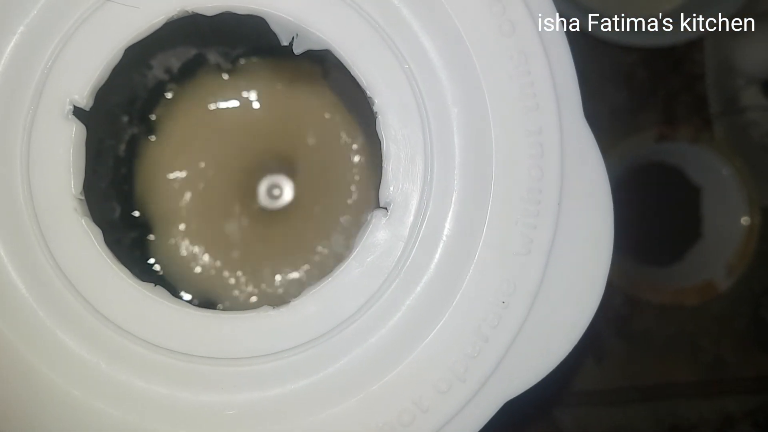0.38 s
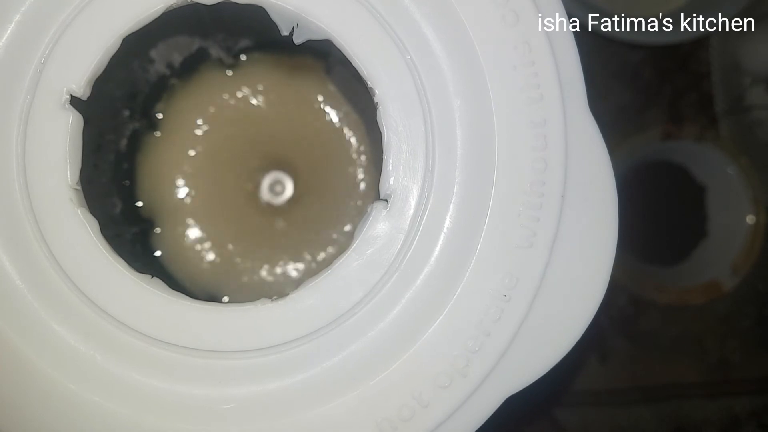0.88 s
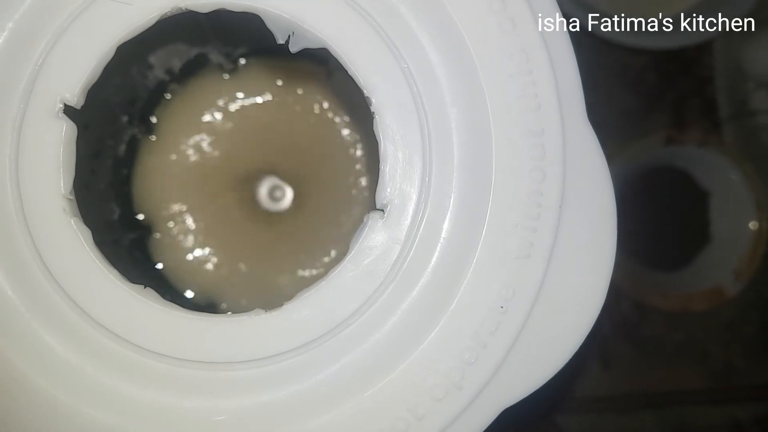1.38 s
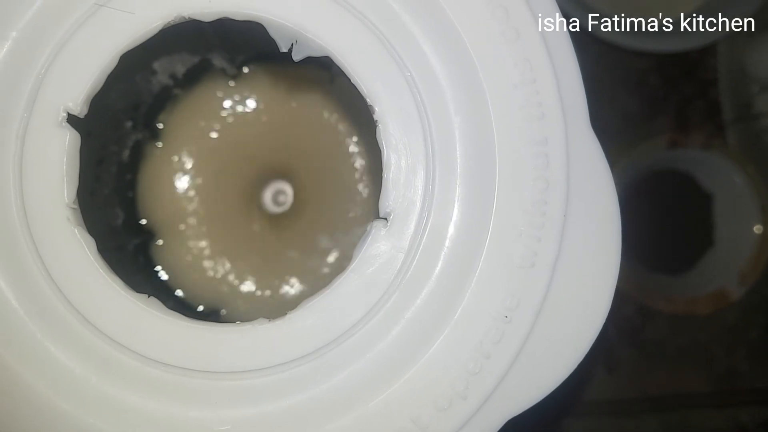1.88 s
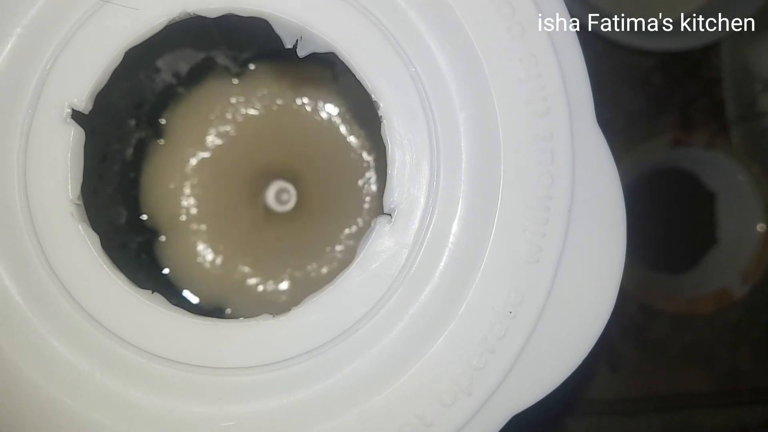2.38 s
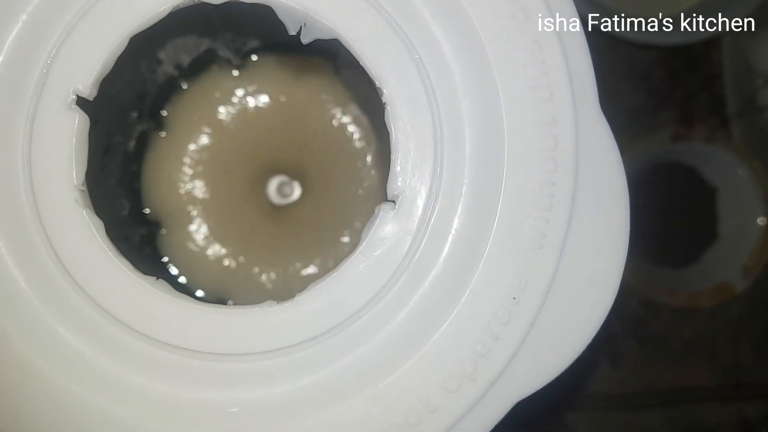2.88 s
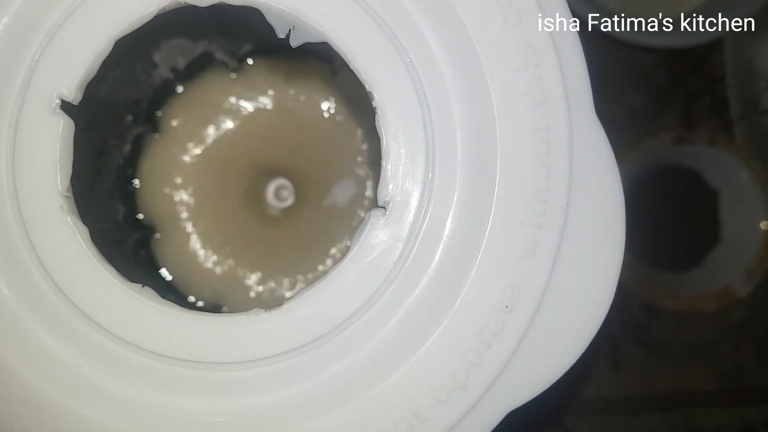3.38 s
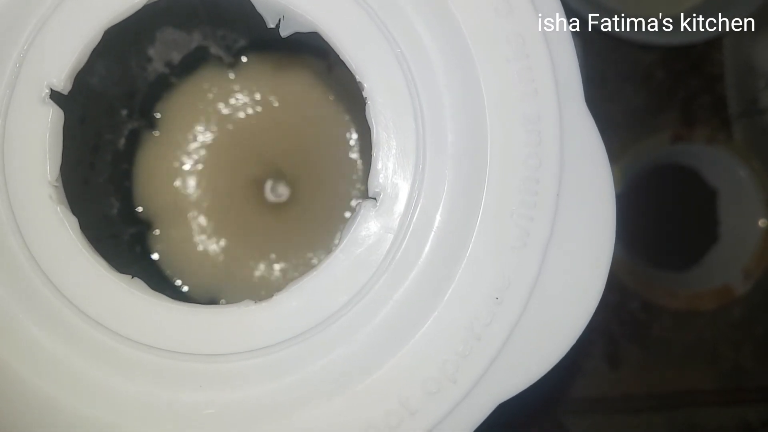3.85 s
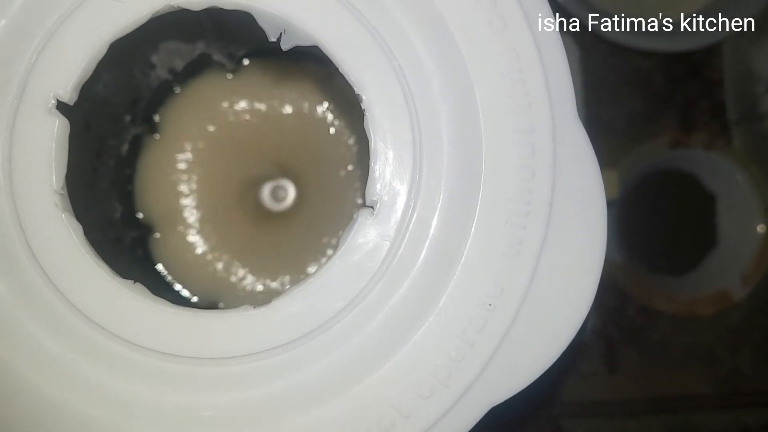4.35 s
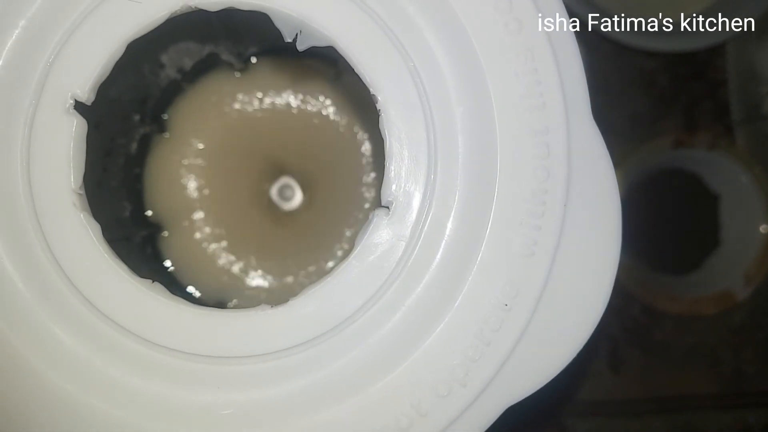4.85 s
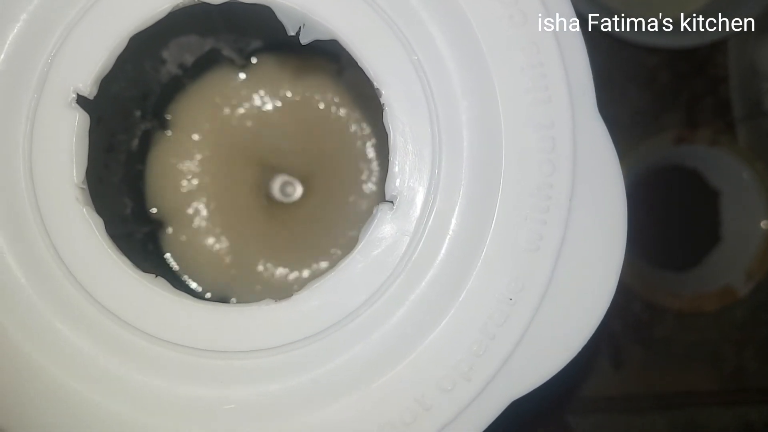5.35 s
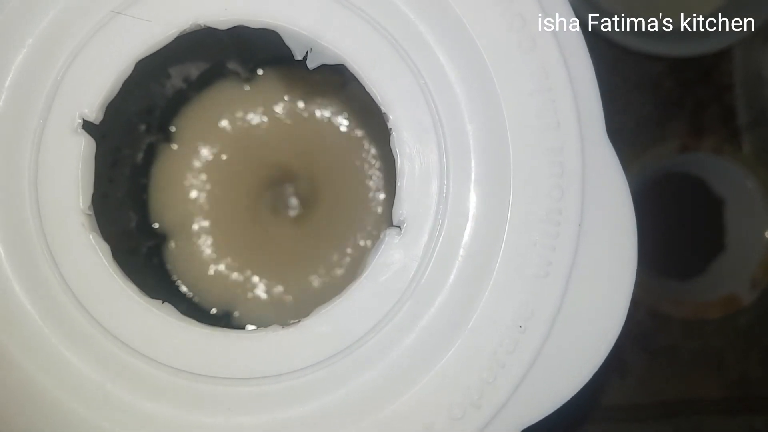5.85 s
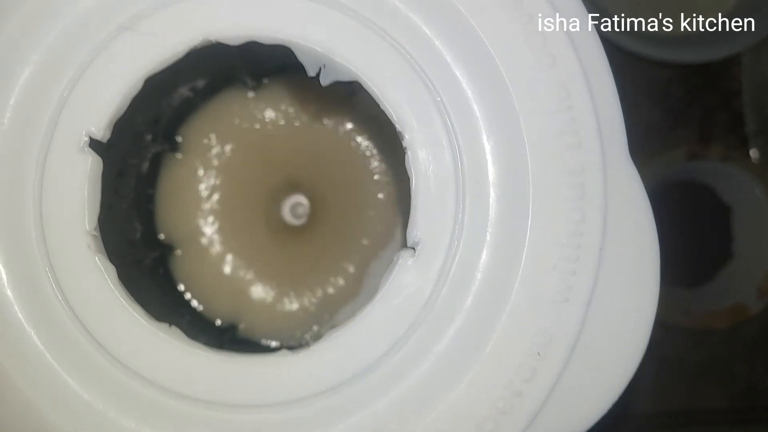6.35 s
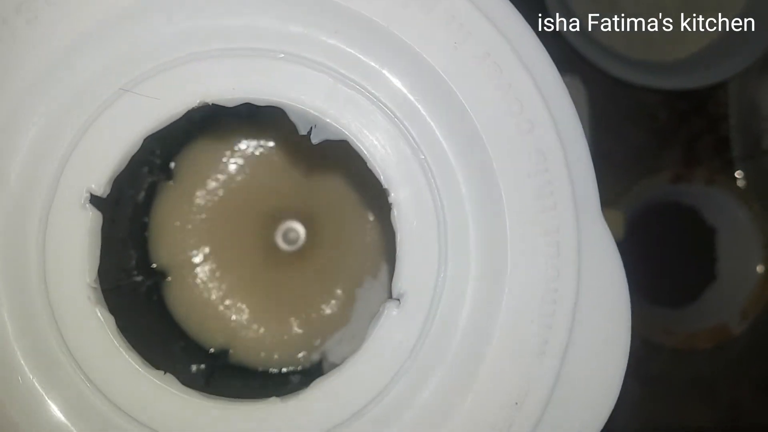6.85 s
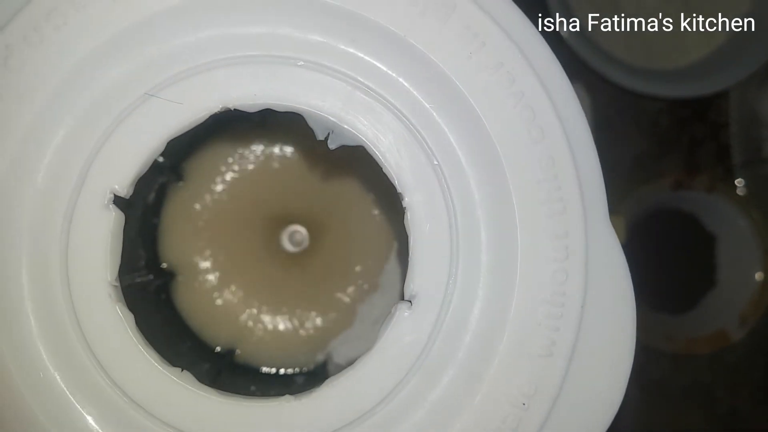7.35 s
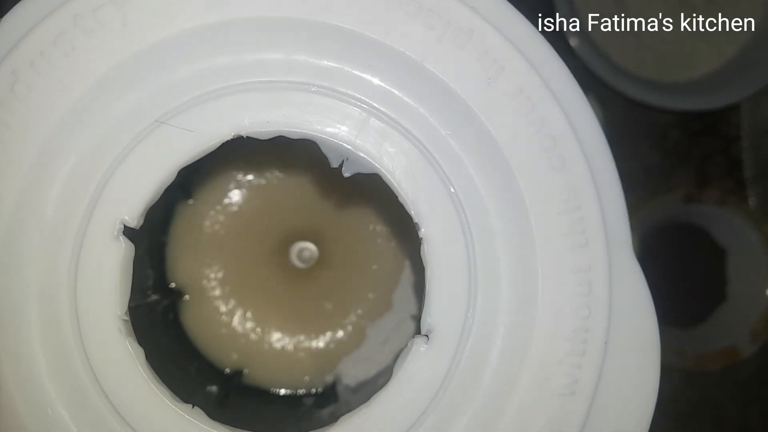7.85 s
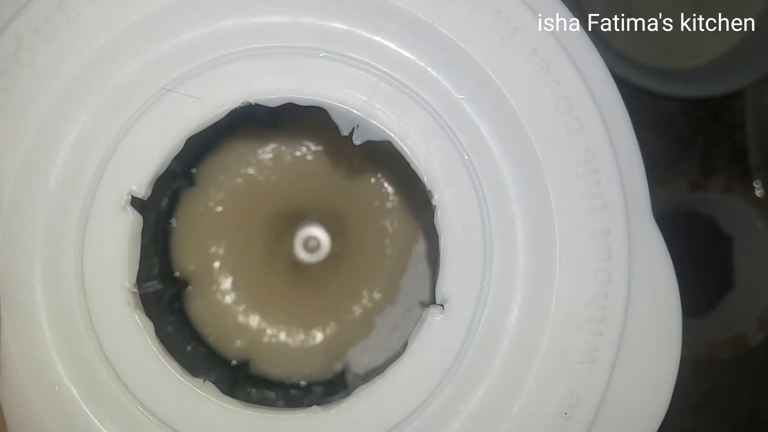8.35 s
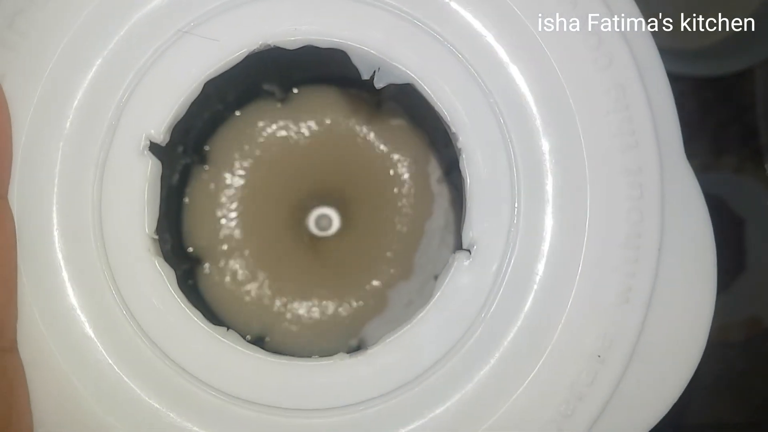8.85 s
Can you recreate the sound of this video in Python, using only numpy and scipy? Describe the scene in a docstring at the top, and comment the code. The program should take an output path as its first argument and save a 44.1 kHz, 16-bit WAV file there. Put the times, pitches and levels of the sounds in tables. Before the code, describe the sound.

Close above an open plastic blender jar, a low electric motor drones as thick liquid gurgles, slaps the walls and ticks in droplets.

```python
"""A blender runs at one setting with thick oil in its plastic jar, two microphones just above the open lid.
From the start the motor hums at mains and shaft rate, while oil sloshes, churns and spatters in jar and air column.
Surges are flung out, the air column booms, waves slap over and drops tick on the wall; the low oil noise is uneven.
The microphones begin half off the lid opening, are nearest it at 1.3 s, and slide away after 6 s as the shaft slows.
Noise and clicks ring the resonances; each microphone hears each resonance with its own level and lag."""
import sys
import numpy as np
from scipy import signal
from scipy.fft import rfft, irfft, next_fast_len
from scipy.io import wavfile

SR = 44100
rng = np.random.default_rng(int(sys.argv[2]) if len(sys.argv) > 2 else 0)


def ratio_of_db(decibels):
    """Turn decibels (scalar or array-like) into linear amplitude factors; 0 dB maps to 1."""
    return 10 ** (np.asarray(decibels, float) / 20)


def waveform_to_disk(signal):
    """Save audio, clipped to [-1, 1], as 16-bit WAV at the path in sys.argv[1]."""
    frames = np.transpose(np.atleast_2d(signal))
    scaled = np.clip(frames, -1, 1) * 32767
    samples = np.round(scaled).astype(np.int16)
    wavfile.write(sys.argv[1], SR, samples)


N = 396018
MAINS_HZ = 50


def rms_one(x):
    """Scales a signal to rms 1."""
    return x / np.sqrt(np.mean(x ** 2) + 1e-20)


def in_time(rows):
    """Draws straight lines through (s, value, ..) rows, one curve per column."""
    s, *columns = np.transpose(rows)
    return [np.interp(np.arange(N) / SR, s, c) for c in columns]


def drift(rate_hz):
    """Slow chance of spread 1: noise at every 40th sample through a double one-pole low-pass."""
    r = np.exp(-80 * np.pi * rate_hz / SR)
    noise = rng.standard_normal(N // 40 + 2002)
    slow = signal.lfilter([1], [1, -2 * r, r * r], noise)[2000:]
    return np.interp(np.arange(N) / 40, np.arange(len(slow)), rms_one(slow - slow.mean()))


def bumps(s, rise_db, length_s):
    """Bell-shaped swells in dB around the times s, down to 1/e at length_s to either side."""
    coarse = np.arange(0, N + 100, 100) / SR
    bells = np.exp(-((coarse - np.c_[s]) / np.c_[length_s]) ** 2)
    swell_db = np.sum(np.c_[rise_db] * bells, axis=0)
    return np.interp(np.arange(N) / SR, coarse, swell_db)


def resonate(x, hz, width_hz):
    """A resonance passed twice, for steep flanks; gain 1 on top."""
    r = np.exp(-np.pi * 1.55 * width_hz / SR)   # each pass is wider, as two passes narrow the peak
    stage = [(1 - r * r) / 2, 0, (r * r - 1) / 2, 1, -2 * r * np.cos(2 * np.pi * hz / SR), r * r]
    return signal.sosfilt([stage, stage], x)


def ring(x, hz, width_hz):
    """A resonance passed once: it speaks at once and dies away."""
    r = np.exp(-np.pi * width_hz / SR)
    return signal.lfilter([(1 - r * r) / 2, 0, (r * r - 1) / 2],
                          [1, -2 * r * np.cos(2 * np.pi * hz / SR), r * r], x)


def place(pair, hz, left_db, right_db, lag):
    """Level at each microphone; the right one hears it a part of a cycle later."""
    late = np.roll(pair[1], round(lag * SR / (2 * np.pi * hz)))
    return np.array([ratio_of_db(left_db) * pair[0], ratio_of_db(right_db) * late])


# Magnetic hum. Each row: multiple of mains, level in dB.
HUM = [(1, -54), (2, -45.5), (3, -66), (4, -36.5), (6, -32)]
# The shaft sags as the load grows. Each row: time in seconds, turns in Hz.
SHAFT = [(0, 124.7), (.4, 124.5), (1.5, 122.4), (1.9, 124), (2.4, 127.4), (3.7, 126.1), (4.1, 125.8),
         (4.8, 123.9), (5.6, 124), (6, 122.6), (6.5, 119), (6.75, 120.7), (7.1, 118.3), (7.3, 119.8),
         (7.55, 117.5), (8.2, 120), (8.45, 115.8), (8.75, 118.9), (8.98, 116)]
# Tones of the rotor. Each row: multiple of shaft rate, added multiple of mains, level in dB, waver in dB.
ROTOR = [(1, 0, -35.5, 0.5), (1, 2, -32, 2), (2, 0, -38, 4)]


def motor():
    """Magnetic hum at mains multiples, unbalance at shaft rate and its beat with the pulsing torque."""
    mains = 2 * np.pi * MAINS_HZ * np.arange(N) / SR
    shaft = 2 * np.pi * np.cumsum(in_time(SHAFT)[0]) / SR
    hum = sum(ratio_of_db(db + 0.5 * k * drift(4.6)) * np.sin(round(k) * mains) for k, db in HUM)
    rotor = 0
    for k, m, db, waver_db in ROTOR:
        level = ratio_of_db(db + waver_db * drift(7.9))
        rotor = rotor + level * np.sin(round(k) * shaft + round(m) * mains + 0.25 * drift(4.3))
    return np.sqrt(2) * (hum + rotor) * ratio_of_db([[-.6], [.6]])   # a little stronger on the right


# Broad roar between the resonances. Each row: frequency in Hz, left and right density in dB per Hz,
# relative to the resonances.
WASH = [(35, -76, -80), (75, -70, -78), (110, -68, -67), (143, -68, -65), (164, -56, -53), (240, -55, -51),
        (405, -54.5, -55), (672, -63.5, -60), (1214, -54.5, -52.5), (1360, -64, -56.5), (1770, -68, -59),
        (2950, -77, -61.5), (3630, -68.5, -60), (5230, -95, -76.5), (6010, -77, -66.5), (7370, -89, -78.5),
        (11700, -95.5, -100), (15500, -85, -82)]
# How far both microphones hear the same roar. Each row: frequency in Hz, likeness from 0 to 1.
WASH_ALIKE = [(100, 1), (500, 0.51), (900, 0.78), (1500, 0.2), (15000, 0)]


def roar(low_hz, high_hz):
    """Smooth turbulent noise of one band, most alike on both sides in the bass."""
    size = next_fast_len(N)
    hz = np.fft.rfftfreq(size, 1 / SR) + 1e-3
    at, left_db, right_db = np.transpose(WASH)
    density_db = [np.interp(np.log(hz), np.log(at), db) for db in (left_db, right_db)]
    colour = ratio_of_db(density_db) * np.sqrt(SR / 2)
    at, likeness = np.transpose(WASH_ALIKE)
    alike = np.clip(np.interp(np.log(hz), np.log(at), likeness), 0, 1)
    shared, *own = rfft(rng.standard_normal((3, size)))
    inside = ((1 + (low_hz / hz) ** 24) * (1 + (hz / high_hz) ** 24)) ** -.5
    both = np.sqrt(alike) * shared + np.sqrt(1 - alike) * np.array(own)
    return irfft(colour * inside * both, size)[:, :N]


# Resonances of jar and air column. Each row: frequency in Hz, width in Hz, relative left and right level in dB.
JAR = [(175.4, 25, -31, -30), (302.4, 30.7, -25.5, -22.5), (365.3, 38, -31, -29), (491, 110, -34.5, -33.5),
       (1009.5, 83, -31.5, -32.5), (1280, 66, -30, -26.5), (1583, 116, -34.5, -28),
       (2163, 85, -39.5, -43.5), (2380, 70, -38, -32.5), (2535, 100, -42.5, -35.5), (3118, 150, -39.5, -36),
       (3614, 94, -53, -34), (4110, 520, -34, -26.5), (4830, 110, -41.5, -34), (4990, 360, -41, -76),
       (5770, 850, -75, -51), (6520, 640, -46, -45), (7536, 170, -74, -42.5), (8280, 250, -43, -48.5),
       (8620, 440, -45, -43.5), (9250, 390, -37, -59), (10260, 200, -36.5, -49), (11470, 430, -40, -45.5),
       (12350, 460, -35, -44), (13360, 910, -31.5, -33.5), (14160, 800, -33, -32), (14800, 400, -43, -38),
       (15100, 500, -40, -38)]
# How the two microphones share them, in the same order. Each row: approximate frequency in Hz (a label),
# lag of the right one in radians, left-right likeness of smooth noise from 0 to 1.
PAIR = [(178, -0.1, 0.99), (301, 0.2, 0.99), (380, 0.4, 0.97), (490, 0.3, 0.95), (1010, 0.1, 0.87),
        (1280, 1.1, 0.87), (1600, 2.8, 0.63), (2165, -1.1, 0.48), (2385, -0.1, 0.72), (2520, 2.5, 0.4),
        (3250, -2.8, 0.15), (3610, 1.3, 0.67), (4150, 1.9, 0.85), (4850, 2.9, 0.28), (5250, -3.1, 0.83),
        (5550, 3.1, 0.8), (6600, -2.9, 0.71), (7480, -1.8, 0.4), (8150, -1.3, 0.44), (8600, 0.1, 0.61),
        (9250, 0.6, 0.38), (10250, 3.1, 0.53), (11400, -1.5, 0.25), (12250, -1.8, 0.27),
        (13300, -0.2, 0.38), (14100, -2.2, 0.25), (14600, -2.4, 0.3), (15050, -0.6, 0.27)]


def resonances():
    """Each resonance of the jar with its width, levels, lag and likeness."""
    return [(*body, lag, alike) for body, (_, lag, alike) in zip(JAR, PAIR)]


def strike(s, peak_db, reach_db, body=resonate):
    """Blows at times s ring every resonance, each as strongly as reach_db(hz) says."""
    out = np.zeros((2, N))
    for hz, width_hz, left_db, right_db, lag, _ in resonances():
        clicks = np.full(N, 1e-18)
        blow_db = peak_db + reach_db(hz) + rng.normal(0, 1.8, len(s))
        clicks[(s * SR).astype(int)] = ratio_of_db(blow_db) * SR / np.sqrt(width_hz)
        out += place([body(clicks, hz, width_hz)] * 2, hz, left_db, right_db, lag)
    return out


# The loudest drops hitting the wall. Each row: time in seconds, relative level in dB, brightness in dB.
DROPS = [(0.4266, -10, -4), (0.4743, -11, -4), (0.7325, -11, -4), (1.3326, -5, -9), (1.37, -8, -12),
         (1.392, -9, -6), (1.444, -8, -6), (1.5758, -8, -15), (1.6162, -2.5, -21), (1.6705, -11.5, -7),
         (1.7539, -9, -21), (1.7777, -3, -15), (1.856, -12, -5), (1.8765, -7, -9), (1.927, -9.5, -1),
         (1.9659, -7, -15), (2.151, -8, -20), (2.38, -10, -8), (2.4758, -6, -12), (2.8355, -9, -17),
         (2.8898, -12, 1), (3.0121, -10, -22), (3.1767, -17, 3), (3.6096, -8, -18), (3.9916, -8, -11),
         (4.349, -7, -18), (4.4223, -7, -15), (4.6887, -1, -23), (4.862, -13, -18), (4.882, -16, -15),
         (5.052, -10, -10), (5.224, -7, -18), (5.2844, -10, -13), (5.332, -11, -15), (5.367, -9, -17),
         (5.437, -10, -18), (5.482, -12, -15), (5.5298, -3.5, -19), (5.6955, -10, -21), (6.0564, -8.5, -6),
         (7.1147, -4, -12), (7.1417, -26, 12), (7.223, -8, -8), (7.412, -15, -17), (7.5323, -6, -13),
         (7.581, -13, -18), (7.605, -13, -18), (7.6505, -24, -15), (7.66, -2, -20), (7.666, -9, -1),
         (7.717, -12, -7), (7.775, -12, -12), (8.487, -11, 7), (8.5894, -2, -9), (8.6393, -10, -4),
         (8.801, -22, 8)]
# Smaller drops fall at random moments.
STRAY_DROPS, STRAY_DB, STRAY_SPREAD_DB, STRAY_BRIGHT_DB = 140, -24.5, 4.5, -24
STRAY_SLID_DB = 1   # rise of the small drops at full slide
STRAY_FOLLOWS = 1   # share of the splash swing in their size
DROP_SMEAR_S = .006   # a drop bursts in three touches within this time


def drops():
    """A drop rings mostly near 4 kHz; a bright one reaches the highest resonances."""
    when, size = rng.random((STRAY_DROPS, 2)).T
    when_s = when * (N / SR - .1)
    splash_db = np.interp(when_s, *np.transpose(SPLASH)) - USUAL_SPLASH_DB
    slid_db = STRAY_SLID_DB * np.interp(when_s, *np.transpose(SLIDE))
    stray_db = STRAY_DB + STRAY_SPREAD_DB * (2 * size - 1) + STRAY_FOLLOWS * splash_db + slid_db
    stray = np.c_[when_s, stray_db, STRAY_BRIGHT_DB + 0 * when]
    s, peak_db, bright_db = np.repeat(np.vstack([DROPS, stray]), 3, axis=0).T
    touch_s = s + DROP_SMEAR_S * (rng.random(len(s)) - .3)

    def reach_db(hz):
        treble_db = bright_db * np.clip(np.log(hz / 4300) / .5, 0, 1)
        return treble_db - 17 * max(np.log(4000 / hz), 0)

    return strike(touch_s.clip(0), peak_db - 15, reach_db)


# Waves of oil folding over against the wall, ringing the resonances near their pitch.
# Each row: time in seconds, relative level in dB, pitch in Hz.
SLAPS = [(0.025, -5, 1020), (0.196, -12, 1250), (0.412, -12, 1050), (0.556, -9, 982), (0.734, -2, 1150),
         (0.79, -19, 991), (0.872, -2, 1040), (1.147, -20, 1160), (1.25, -7, 1270), (1.557, -12, 1260),
         (2.159, -8, 1250), (2.449, -7, 1276), (2.593, -3, 1260), (2.869, -11, 1280), (2.894, -5, 1250),
         (3.001, 1, 1250), (3.055, -22, 1284), (3.105, -12, 1300), (3.181, -6, 1283), (3.252, -8, 1260),
         (3.303, -8, 1330), (3.595, -3, 1060), (3.701, -1, 990), (3.974, -4, 1010), (4.047, -1.5, 1240),
         (4.135, -3.5, 1270), (4.219, -8, 1010), (4.259, -11, 1030), (4.401, -10, 1240), (4.469, -4, 1290),
         (4.572, -20, 1270), (4.819, -10, 1270), (4.866, -18, 1252), (5.818, -13, 1134), (5.868, -4, 1280),
         (5.911, -3, 1310), (6.056, -7, 1070), (6.407, -4, 1050), (6.56, -17, 1270), (7.085, -14, 1040),
         (7.3, 0, 1040), (7.465, -2, 996), (7.515, -5, 1270), (7.553, -15, 700), (7.577, 1.5, 970),
         (7.667, -5, 1270), (8.266, -2, 980), (8.479, -8, 1280), (8.902, -8, 1307), (0.7088, -19, 2380),
         (0.7916, -26, 2360), (0.926, -30, 2320), (0.991, -12.5, 2410), (1.068, -11.5, 2370),
         (1.273, -15, 2340), (1.833, -11, 2390), (2.5318, -13, 2390), (2.6944, -17, 2400),
         (3.0485, -23, 2400), (3.6665, -13, 2395), (3.8631, -28, 2400), (4.3236, -14, 2360),
         (4.4084, -14, 2380), (4.573, -12, 2340), (5.2328, -8, 2400), (5.3592, -13, 2355),
         (5.42, -19, 2380), (7.5877, -10, 2410), (7.666, -10, 2390), (8.063, -13, 2430),
         (8.7022, -11, 2380)]
SLAP_RING_DB, SLAP_THUD_DB = -11.5, 18.5
SLAP_REACH_DB = 19.5   # loss per e-fold of pitch away
SLAP_HIGH_DB = 8   # a small high slap strikes harder for its level, per octave
SLAP_SOFT_HZ = 4000   # the ringing of the slaps is dull above this


def slaps():
    """A slap is a blunt thud of about one cycle that rings the resonances near its pitch."""
    s, peak_db, pitch_hz = np.transpose(SLAPS)
    clicks = np.full(N, 1e-18)
    clicks[(s * SR).astype(int)] = -ratio_of_db(peak_db + SLAP_THUD_DB) * (1000 / pitch_hz) ** 2
    thud = resonate(clicks, 710, 510)

    def reach_db(hz):
        return -SLAP_REACH_DB * abs(np.log(hz / pitch_hz))

    ring_db = peak_db + SLAP_RING_DB + SLAP_HIGH_DB * np.log2(pitch_hz / 1250)
    ringing = strike(s, ring_db, reach_db, body=ring)
    soft = signal.butter(2, SLAP_SOFT_HZ, fs=SR, output="sos")
    return thud + signal.sosfilt(soft, ringing)


# The air column in the vortex is knocked and rings out.
# Each row: time in seconds, relative peak in dB, pitch in Hz.
BOOMS = [(0.162, -5, 328), (0.35, -7, 307), (0.593, -3.5, 303), (1.038, -6, 308), (1.106, -6, 332),
         (1.586, -9, 300), (1.671, -9, 310), (2.167, -10, 313), (2.676, -15, 303), (2.739, -3.5, 296),
         (2.848, -3, 287), (2.982, -7, 316), (3.121, -7, 313), (3.347, -6, 282), (3.512, -3.5, 310),
         (3.591, -4, 310), (4.11, -7, 296), (4.443, -9, 304), (4.548, -3.5, 304), (4.698, -6, 304),
         (5.153, -4.5, 299), (5.949, -3, 306), (6.424, -15, 335), (6.685, -23, 295), (6.95, -2.5, 324),
         (7.096, -2, 300), (7.307, -2, 285), (7.602, -3.5, 302), (7.855, -1.5, 310), (8.04, -29, 305),
         (8.208, -8, 304), (8.31, -5, 313), (8.377, 0.5, 314), (8.638, -5, 293), (8.806, -5, 334),
         (8.926, -6, 344)]
BOOM_RISE_S, BOOM_DECAY_S, BOOM_DB = 0.0039, 0.013, -8.5


def booms():
    """Each knock on the air column swells within a cycle or two and dies away."""
    out, t = np.zeros(N + SR), np.arange(SR // 8) / SR
    shape = (1 - np.exp(-t / BOOM_RISE_S)) * np.exp(-t / BOOM_DECAY_S)
    for (s, peak_db, hz), turn in zip(BOOMS, rng.random(len(BOOMS))):
        tone = np.sin(2 * np.pi * (hz * t + turn))
        out[int(s * SR):][:len(t)] += ratio_of_db(peak_db + BOOM_DB) * shape / shape.max() * tone
    return out[:N] * ratio_of_db([[-1.2], [1.2]])


def motion(low_hz, high_hz, per_s, spread_db, share, flicker_db, throb):
    """Turbulence and clumped grains of oil drive every resonance in the band, throbbing with the torque."""
    share, swell_db = np.clip(share, 0, 1), 0.43 * flicker_db * drift(34.0)
    born = rng.random(N) < per_s * ratio_of_db(5 * drift(25)) / SR   # grains come in clumps
    grain_size = ratio_of_db(spread_db * np.minimum(rng.exponential(1, N), 4))
    grains = born * grain_size * rng.choice([-1, 1], N)
    out = roar(low_hz, high_hz)
    for hz, width_hz, left_db, right_db, lag, alike in resonances():
        if low_hz < hz <= high_hz:
            shared, *own = rng.standard_normal((3, N))
            smooth = np.sqrt(alike) * shared + np.sqrt(1 - alike) * np.array(own)
            grit = rms_one(grains * ratio_of_db(2.9 * own[0]))   # a grain strikes each resonance unevenly
            force = np.sqrt(1 - share) * smooth + np.sqrt(share) * grit
            force = force * ratio_of_db(flicker_db * drift(11.7))
            out += place(rms_one(resonate(force, hz, width_hz)), hz, left_db, right_db, lag)
    torque = 1 + throb * np.sin(2 * np.pi * MAINS_HZ * np.arange(N) / SR)
    level = np.sqrt(np.mean(out.mean(axis=0) ** 2))   # rms of both microphones averaged
    return ratio_of_db(swell_db) * torque * out / level


# Rumble, heave, slosh, swirl, churn, spatter and spray. Each row: low and high edge in Hz,
# typical grains per second, grain spread in dB, grain share from 0 to 1, flicker in dB, mains throb from 0 to 1.
MOTIONS = [(30, 150, 97, 4.5, 0.01, 0, 0), (164, 222, 82, 4.5, 0.04, 0.5, 0),
           (218, 375, 150, 3.5, 0.24, 1.0, 0.06), (457, 803, 250, 7, 0.32, 3.5, 0.02),
           (873, 2960, 440, 4, 0.33, 2, 0.14), (3040, 7600, 900, 6.5, 0.53, 2, 0.07),
           (6500, 14000, 4500, 6, 0.63, 1.5, 0.08)]
# How those motions follow the splashing. Each row: level at rest in dB, share of the splash swing,
# share of a surge, shared flutter in dB.
FOLLOWING = [(-43.5, -0.13, 0.01, 0), (-31, -0.17, 0.087, 1), (-24.5, 0.49, 0.065, 0.5),
             (-34, 0.23, 1, 1.17), (-23.5, -0.002, 0.25, 0.65), (-33, 0.21, 0.4, 0.9), (-39, 0.9, 0.51, 1)]
# How hard the oil splashes. Each row: time in seconds, strength in dB.
SPLASH = [(0.02, -40), (.14, -43), (.2, -33), (.35, -31.5), (.7, -34.5), (1.0, -35), (1.4, -33.5),
          (2.0, -32.5), (2.7, -36), (3.2, -34), (3.6, -33), (4.03, -41), (4.4, -33), (5.9, -35.5),
          (6.2, -37.5), (6.6, -34), (6.85, -40.5), (7.1, -36), (7.2, -44.5), (7.4, -39.5), (7.5, -32.5),
          (7.7, -34), (7.85, -36.5), (8.3, -42.5), (8.5, -30.5), (8.9, -38)]
USUAL_SPLASH_DB = -37
# The vortex collapses onto the blades and a surge of oil is flung out, or the oil slackens (negative rise).
# Each row: time in seconds, rise in dB before each motion's share, length in seconds to either side.
SURGES = [(0.445, 4.5, 0.025), (0.66, 5.5, 0.042), (1.108, 4, 0.041), (1.405, 7.5, 0.095),
          (1.569, 8, 0.036), (1.804, 4, 0.046), (1.953, 9, 0.016), (2.196, 4, 0.038), (2.575, 5, 0.05),
          (2.827, 6, 0.083), (2.985, 5, 0.033), (3.23, 5, 0.068), (3.622, 5, 0.076), (4.448, 6, 0.052),
          (5.287, 5, 0.048), (5.649, 7, 0.032), (5.924, 6, 0.18), (6.438, 2.5, 0.11), (7.08, 6, 0.016),
          (7.575, 4, 0.082), (7.67, 5.5, 0.023), (7.987, -3, 0.14), (8.44, 6.5, 0.074), (8.606, 13, 0.013),
          (8.951, 2.5, 0.044)]
# Uneven swells and dips of the low oil noise. Each row: time in seconds, rise in dB, centre pitch in Hz.
SWELLS = [(0.03, 5, 185), (.57, -0.5, 220), (1.11, 4, 300), (1.29, -4, 168.3), (1.47, 1, 300),
          (1.56, -7, 189), (1.7, 7.5, 299), (2.18, 6.5, 302), (2.55, 7, 171), (2.82, 3, 190), (2.9, 5, 300),
          (3.02, 9, 304), (3.23, -2, 169), (3.35, 4, 282), (3.52, 1.5, 271), (3.61, 3.5, 284),
          (4.47, 5.5, 300), (4.63, 6, 180), (4.72, 1, 297), (4.94, 0.5, 240), (5.32, 6.5, 201),
          (5.67, 8, 190), (5.8, 7.5, 240), (5.9, 2, 300), (6.07, 6.5, 260), (6.41, 8.5, 178.4),
          (6.7, 2, 189.4), (6.84, 13.5, 190), (6.969, 1.5, 249), (7.12, 0, 251), (7.32, 6, 280),
          (7.4, 9, 169.6), (7.85, 4, 260.5), (8.23, 8, 170), (8.4, 6.5, 242), (8.52, -1, 176),
          (8.6, -2.5, 610), (8.82, 5.5, 229.6), (8.93, -2, 550), (8.97, 7, 298)]
SWELL_S, SWELL_REACH_OCTAVES, SWELL_ABOVE_HZ = 0.028, 0.92, 180   # the lowest rumble is left alone
FLUTTER_HZ = 20.4   # pace of the unevenness that the motions share


def oil():
    """Each motion follows the splashing and surges by its share; swells and dips move those near their pitch."""
    splash_db = in_time(SPLASH)[0] - USUAL_SPLASH_DB
    surge_db = bumps(*np.transpose(SURGES))
    s, rise_db, hz = np.transpose(SWELLS)
    out, flutter = 0, drift(FLUTTER_HZ)
    for (rest_db, splash, surge, flutter_db), (low_hz, high_hz, *texture) in zip(FOLLOWING, MOTIONS):
        octaves_off = np.maximum(np.log2(low_hz / hz), 0) + np.maximum(np.log2(hz / high_hz), 0)
        near = np.clip(1 - octaves_off / SWELL_REACH_OCTAVES, 0, 1) * (high_hz > SWELL_ABOVE_HZ)
        swell_db = bumps(s, rise_db * near, SWELL_S + 0 * s)
        level_db = rest_db + splash * splash_db + surge * surge_db + swell_db + flutter_db * flutter
        out = out + ratio_of_db(level_db) * motion(low_hz, high_hz, *texture)
    return out


# The hand drifts and the microphones slide off the lid opening. Each row: time in seconds, share from 0 to 1.
SLIDE = [(0, 0.5), (1.3, 0.1), (5.9, 0.27), (6.7, 0.6), (7.3, 0.7), (7.65, 0.47), (7.9, 1), (8.4, 0.9),
         (8.6, 0.8), (8.98, 0.99)]
# Colour beside the opening, at full slide. Each row: frequency in Hz, change in dB.
SLID_COLOUR = [(130, -1), (175, 1.5), (220, -2), (300, 0), (380, 1.5), (500, 1), (750, 1.5), (1000, 3),
               (1280, -1), (1600, 1.5), (1800, -1), (2050, 5.5), (2250, 0.1), (2390, -6), (2550, 0.3),
               (3000, 2.5), (3630, -2), (3780, -0.5), (3950, -8.5), (4400, -5.5), (4660, 1), (4870, -8),
               (5250, 3), (5450, 5), (5800, 3), (6500, 5.5), (7600, -1), (11000, 2.5), (14000, -4)]


def slide(x):
    """The colour fades towards that heard beside the lid opening."""
    at, db = np.transpose(SLID_COLOUR)
    hz = np.fft.rfftfreq(N, 1 / SR) + 1
    beside = irfft(rfft(x) * ratio_of_db(np.interp(np.log(hz), np.log(at), db)), N)
    return x + in_time(SLIDE)[0] * (beside - x)


BLOWS_ABOVE_HZ = 168   # the blows carry no deep bass


def scene():
    """Motor, oil and the blows on jar and air column, heard by the sliding microphones."""
    high_pass = signal.butter(4, BLOWS_ABOVE_HZ, "high", fs=SR, output="sos")
    blows = signal.sosfilt(high_pass, drops() + slaps() + booms())
    return slide(motor() + oil() + blows)


def roll_off(x):
    """The treble ends steeply here."""
    return signal.sosfilt(signal.butter(12, 15720, fs=SR, output="sos"), x)


# Narrow dips in the sound at each microphone. Each row: frequency in Hz, width in Hz,
# left and right depth from 0 to 1.
DIPS = [(4660, 75, 0.65, 0.55), (5420, 110, 0.65, 0.65), (6900, 150, 0.6, 0.05), (7670, 200, 0.7, 0.14),
        (9470, 200, 0.23, .6)]
BASS_CUT_HZ, TOP_HZ, CEILING = 42, 15470, 0.67


def record(dry):
    """Narrow dips at each microphone, cut bass and top, and slightly rounded peaks."""
    hz = np.fft.rfftfreq(N, 1 / SR) + 1e-3
    dips = [1 - np.outer(depth, np.exp(-((hz - at) / width) ** 2)) for at, width, *depth in DIPS]
    colour = np.prod(dips, axis=0)
    top = .03 + .97 / (1 + (hz / TOP_HZ) ** 300)
    bass = 1 / np.sqrt(1 + (BASS_CUT_HZ / hz) ** 6)
    heard = irfft(rfft(dry) * colour * top * bass, N)
    mix = CEILING * np.tanh(heard / CEILING)
    return roll_off(mix)


dry = scene()
out = record(dry)
waveform_to_disk(out)
```